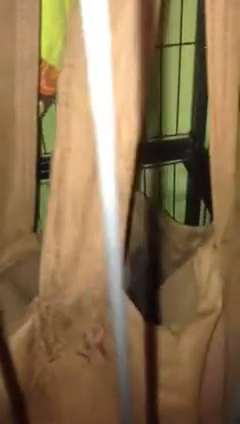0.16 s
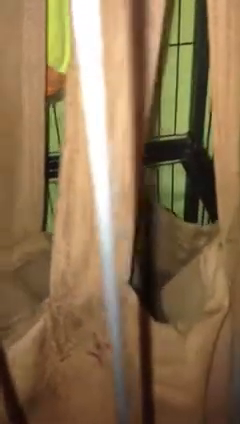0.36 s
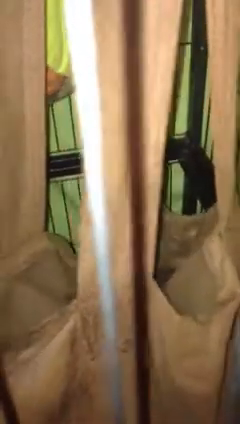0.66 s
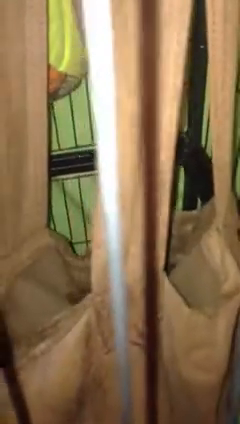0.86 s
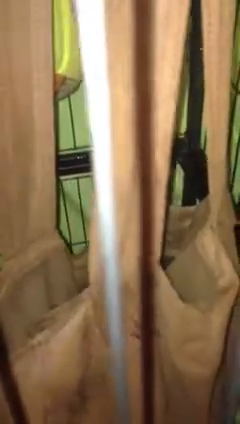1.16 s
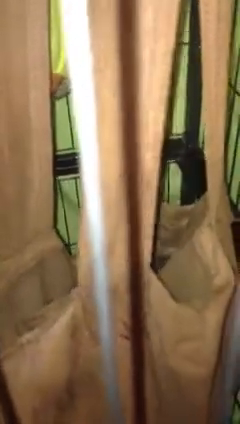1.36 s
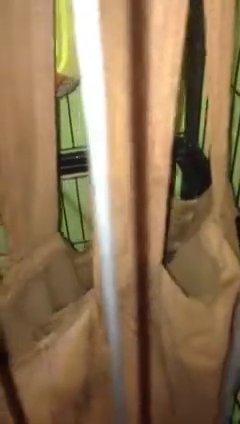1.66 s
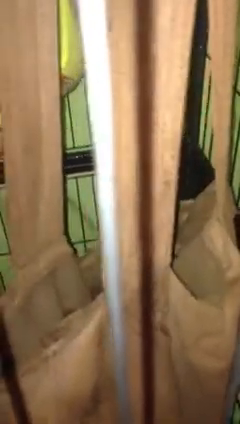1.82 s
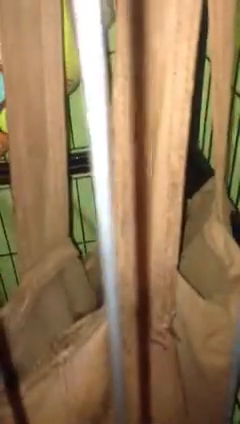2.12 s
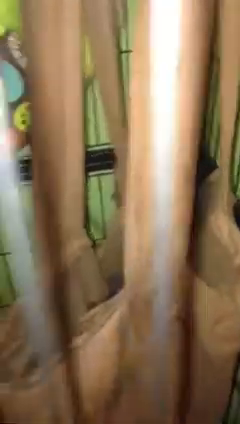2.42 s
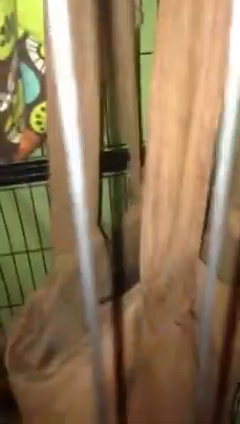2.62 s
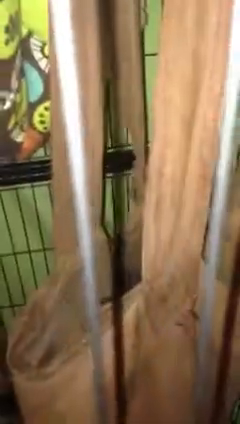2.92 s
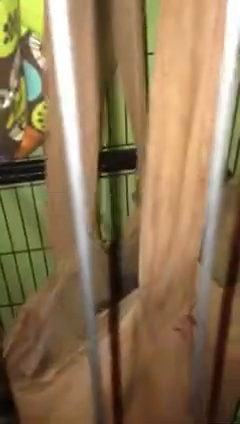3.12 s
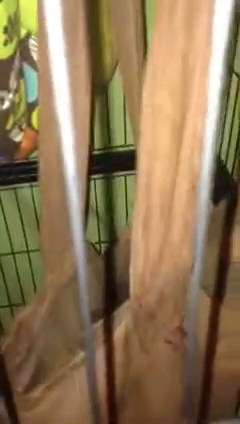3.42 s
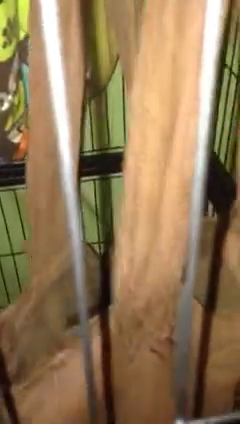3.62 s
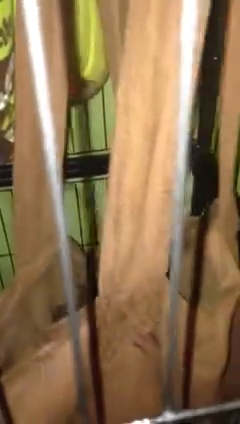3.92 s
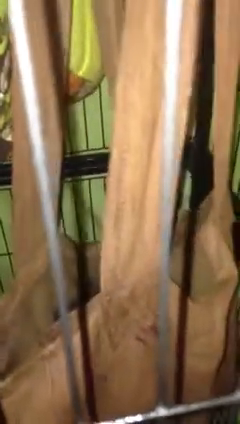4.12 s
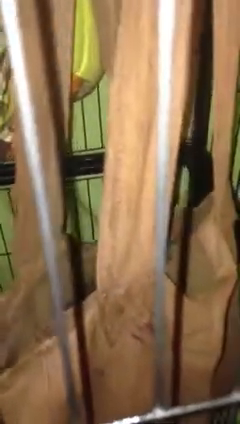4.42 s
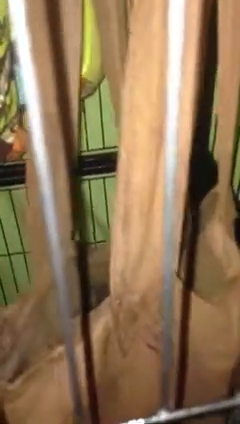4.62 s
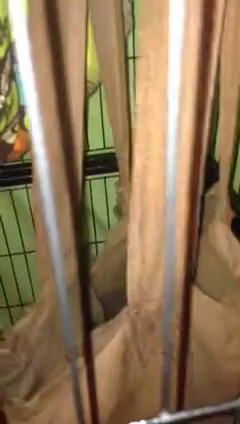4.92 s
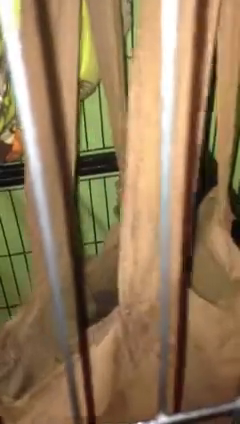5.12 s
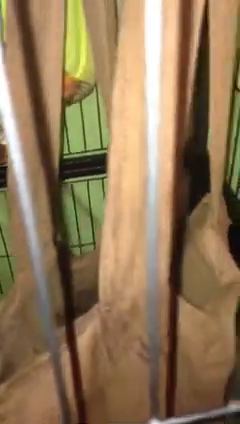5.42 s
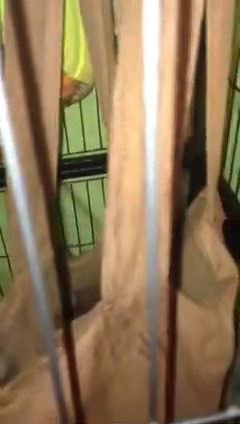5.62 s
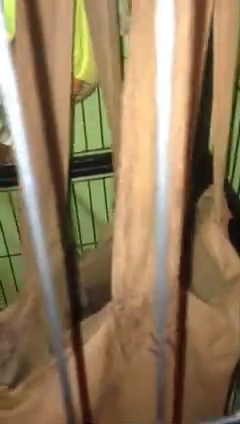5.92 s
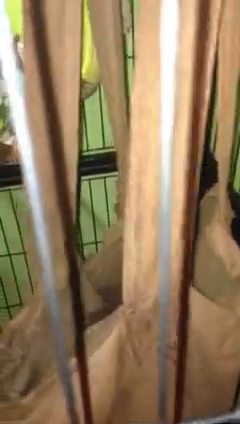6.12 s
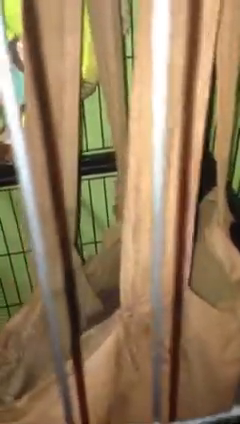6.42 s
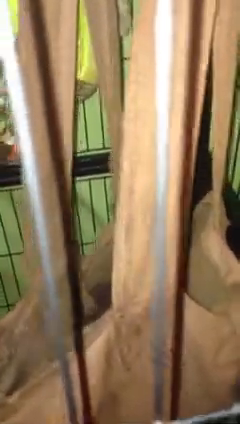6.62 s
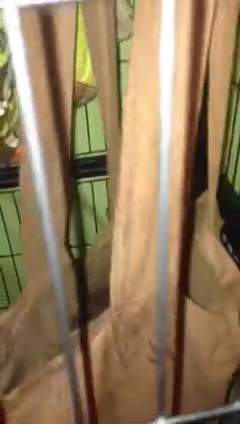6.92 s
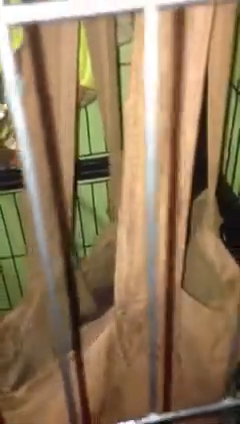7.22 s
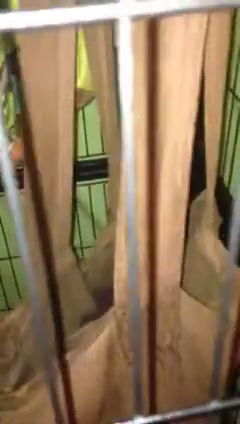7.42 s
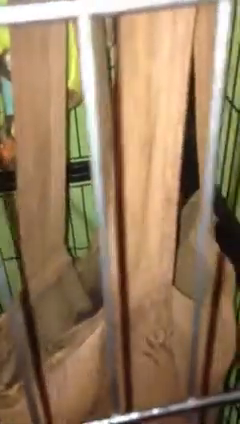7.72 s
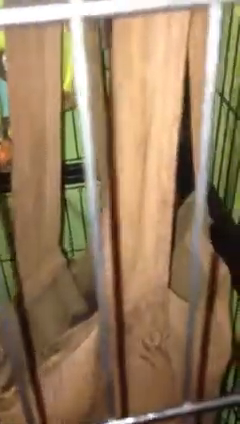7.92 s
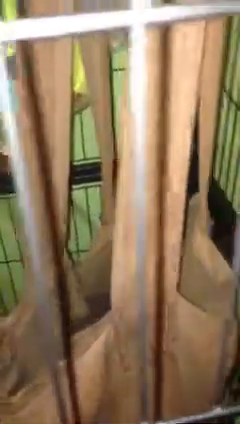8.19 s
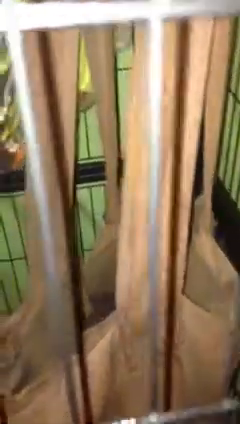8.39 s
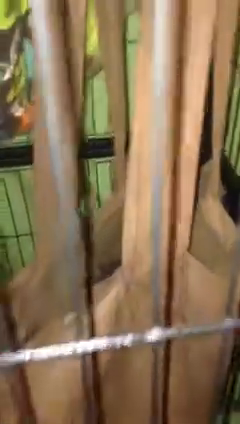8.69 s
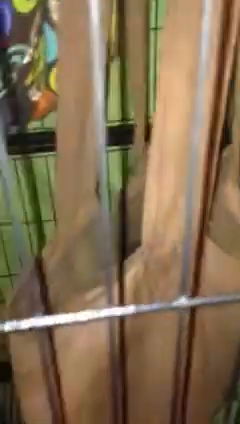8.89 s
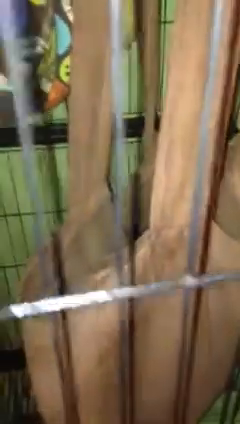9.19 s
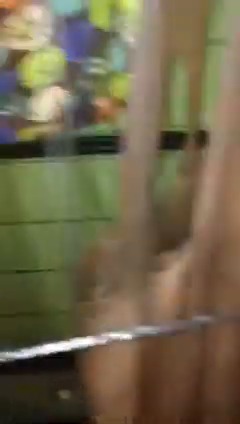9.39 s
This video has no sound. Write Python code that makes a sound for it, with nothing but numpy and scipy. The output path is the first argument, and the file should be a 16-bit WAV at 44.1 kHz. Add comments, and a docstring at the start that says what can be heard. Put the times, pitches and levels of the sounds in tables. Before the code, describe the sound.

In a small, slightly echoing room, a little animal close by gives a steady run of short, rising, raspy squeaks. Its cloth sling rustles faintly and the wire cage clinks now and then. Past the middle, the metal rattles harder, with a few dull knocks. Near the end the calls cease, and the loudest burst of clattering bars and swishing fabric is followed by a few last clinks and a knock.

```python
"""Squeaks, about three a second: a kinkajou's low whimper sweeps hoarsely up into a thin whistle.
It stirs in a cloth hammock inside a wire cage, in a small, live room. The fibres catch and slip in a
rustle, and the sling bumps under its weight. Wire strikes wire in clinks and rattles that set the bars
ringing, harder towards the end, with a few dull knocks on the frame. Faint room air lies underneath."""
import sys
import numpy as np
from scipy import signal
from scipy.fft import rfft, irfft
from scipy.io import wavfile

SR = 44100
rng = np.random.default_rng(int(sys.argv[2]) if len(sys.argv) > 2 else 0)


def master_out(mix):
    """Clip the mix to full scale and print it as 16-bit PCM to the path in sys.argv[1]."""
    frames = np.transpose(np.atleast_2d(mix))
    ceiling = np.clip(frames, -1, 1)
    pcm = np.round(ceiling * 32767).astype(np.int16)
    wavfile.write(sys.argv[1], SR, pcm)


N = 421155
TIME = np.arange(N) / SR

# The whimper's pitch dip: share_of_whimper, pitch_ratio
WHIMPER_DIP = [(0, 1.07), (.2, 1.01), (0.421, 1.0), (0.652, 1.09), (0.852, 1.22)]
def squeak_pitch(t, whimper_s, sweep_s, whimper_hz, ceiling_hz, sweep_from_hz=999, break_hz=2397):
    """The pitch dips, climbs ever faster, flips up into the whistle and flattens under its ceiling."""
    overshoot, bend, flip_ratio, knee = 1.3, 1.15, 1.1, 5.5
    share, ratio = np.transpose(WHIMPER_DIP)
    whimper = np.interp(t / whimper_s, np.append(share, 1), np.append(whimper_hz * ratio, sweep_from_hz))
    octaves = overshoot * np.log2(ceiling_hz / sweep_from_hz)
    aim_hz = whimper * 2 ** (octaves * np.clip((t - whimper_s) / sweep_s, 0, 2) ** bend)
    aim_hz *= np.where(aim_hz > break_hz, flip_ratio, 1)
    return aim_hz / (1 + (aim_hz / ceiling_hz) ** knee) ** (1 / knee)


# The voice's two timbres: harmonic_number, whimper_db, whistle_db
HARMONICS = [(1, -1, -0.5), (2, -5.5, -20.5), (3, -20, -21), (4, -23, -30), (5, -27, -27), (6, -54, -24),
             (7, -31, -54)]
def throat_tone(hz, phase, nasal_hz=3180, nasal_width_hz=550, nasal_db=8):
    """The tone thins to a nearly pure whistle as it rises; a nasal resonance lifts the overtones."""
    thinness = np.interp(hz, [740, 1100, 2800], [0, .65, 1])
    tone = 0
    for k, whimper_db, whistle_db in HARMONICS:
        lift_db = (k > 1) * nasal_db * np.exp(-((k * hz - nasal_hz) / nasal_width_hz) ** 2)
        gain = from_db(whimper_db + thinness * (whistle_db - whimper_db) + lift_db)
        tone += np.sin(k * phase) * gain * (k * hz < SR / 2)
    return np.sqrt(2) * tone


# Mouth resonances that swell the voice as it passes: pitch_hz, gain_db
MOUTH_GAIN = [(680, -0.5), (850, -2.5), (1050, 2), (1350, 1), (2000, -3.5), (2900, 0.5)]
# Throat colour of the rasp: frequency_hz, gain_db
RASP_EQ = [(500, 0), (900, -7), (1500, -29), (2100, 14), (3100, 18), (4000, -12), (6500, -28), (10000, -16)]
# Squeak cues: start_s, whimper_s, sweep_s, whimper_hz, ceiling_hz, level_db, tip_gain_db
SQUEAK_CUES = [ (0.000, 0.068, 0.07, 663, 1900, -56.5, -3.5), (0.278, 0.072, .18, 640, 2830, -56, -1),
               (0.649, 0.11, 0.082, 658, 1913, -55.5, -15), (1.082, 0.089, .027, 625, 1400, -58.5, -14),
               (1.44, 0.097, 0.068, 637, 2066, -57.5, 3), (2.056, 0.099, 0.088, 676, 2050, -58, -6),
               (2.316, 0.1, 0.15, 713, 3647, -55, 5.5), (2.694, 0.094, 0.18, 714, 3480, -49, 8),
               (3.109, 0.085, 0.1, 654, 2198, -51.5, -3), (3.432, 0.086, .15, 699, 2725, -54.5, -1.5),
               (3.766, 0.089, 0.074, 670, 2096, -52.5, 2.5), (4.105, .1, 0.063, 670, 2190, -53.5, 2),
               (4.398, .13, 0.12, 666, 2505, -50, -8), (4.716, .11, .12, 678, 3230, -46.5, 0),
               (5.037, .11, 0.16, 735, 3180, -47, -0.5), (5.387, 0.096, 0.14, 721, 2995, -48, -2),
               (5.701, .115, 0.099, 709, 2208, -48.5, 6), (6.028, 0.099, 0.11, 694.5, 2320, -53.5, 2),
               (6.346, .072, .135, 697, 3400, -50.5, 5.5), (6.671, 0.095, 0.15, 700, 2970, -53.5, -11),
               (6.974, 0.11, .08, 691, 1950, -48.5, -4), (7.293, .11, .065, 697, 1835, -51, -2),
               (7.564, .11, 0.055, 664.5, 1560, -49, -4), (7.833, 0.09, 0.034, 678, 1650, -48.5, -7)]
def squeaks(attack_s=0.01, release_s=0.0095, shimmer_db=4.0, rasp_db=-13.0):
    """The voice sweeps from whimper to whistle, unsteady and hoarse between the two registers."""
    tone, turbulence, t = np.zeros(N), np.zeros(N), TIME[:SR // 2]
    for start_s, whimper_s, sweep_s, whimper_hz, ceiling_hz, level_db, tip_gain_db in SQUEAK_CUES:
        hz = squeak_pitch(t, whimper_s, sweep_s, whimper_hz, ceiling_hz)
        hoarseness = np.interp(hz, [993, 1450, 2060, 2940], [0.036, 0.68, 0.68, 0.033])
        jitter = (0.013 + 0.0524 * hoarseness) * (drift(1100, len(t)) + 0.562 * drift(60, len(t)))
        phase = 2 * np.pi * np.cumsum(hz * (1 + jitter)) / SR
        # the level swells into the sweep, sags, then steps to the tip's gain
        tip_s = whimper_s + 0.69 * sweep_s
        shape_db = np.interp(t, [whimper_s / 2, whimper_s, tip_s], [-2, 0, -2.13], right=tip_gain_db)
        unsteadiness = np.interp(hz, [700, 1400, 2200, 2900], [0.8, 1.0, 0.89, 0.4])
        flicker_db = shimmer_db * unsteadiness * drift(129.4, len(t))
        gate = np.clip(t / attack_s, 0, 1) * np.clip((whimper_s + sweep_s - t) / release_s + .5, 0, 1)
        effort = gate * from_db(level_db + shape_db + at_hz(MOUTH_GAIN, hz) + flicker_db)
        add(tone, start_s, effort * throat_tone(hz, phase))
        # the rasp is pulsed by each cycle and fades out in the whistle
        rasp = np.interp(hz, [700, 1150, 1970, 2870], [0.54, 0.14, 0.64, 0.034]) * (1 + np.sin(phase))
        add(turbulence, start_s, effort * rasp * rng.standard_normal(len(t)))
    return tone + from_db(rasp_db) * colour(turbulence, RASP_EQ)


# Brief high tones in the squeaks: start_s, length_s, pitch_hz, level_db
FLARE_CUES = [(2.57, 0.021, 4060, -49), (4.843, 0.051, 3190, -50.5), (5.522, 0.033, 2810, -57)]
def high_flares():
    """A brief, pure high tone rings out in a squeak, like an overtone flaring or the pitch flipping up."""
    out = np.zeros(N)
    for start_s, length_s, pitch_hz, level_db in FLARE_CUES:
        swell = np.interp((TIME - start_s) / length_s, [0, .5, 1], [0, 1, 0])
        out += np.sqrt(2) * from_db(level_db) * swell * np.sin(2 * np.pi * pitch_hz * TIME)
    return out


def wire_contact(force_db, chatter_s, body_db, touches_per_s=7000, snap_fade_s=0.06):
    """Wire meets wire: a short contact snaps, a long one builds into a dying chatter."""
    t = TIME[:SR // 6]
    touches = rng.standard_normal(len(t)) * (rng.random(len(t)) < touches_per_s / SR)
    build = 1 - np.exp(-t / (0.089 * chatter_s))
    force = unit_energy(touches * build * np.exp(-t / chatter_s))
    force[0] += 0.24 * np.exp(-chatter_s / snap_fade_s)
    body = from_db(body_db) * band(force, 2080, "low")
    middle = band(force, [3000, 8000], "band")
    sparkle = from_db(2 + 0.18 * (force_db + 19)) * band(force, 4660, "high")   # harder is brighter
    return from_db(force_db) * unit_energy(middle - body - sparkle)


# Ringing modes of the bars: pitch_hz, level_db, t60_s
BAR_MODES = [(1790, -12, .5), (3030, -15, .4), (4458, -7, .25), (4528, -7, .25), (4606, -4, .3),
             (4644, -4, .3), (4942, -3, .2), (5072, -6, .2), (5263, -6, .2), (6885, -5, .15),
             (6966, -5, .15), (8504, -1, .15), (8835, -3, .15), (11274, -3, .12)]
def bar_ring(spread_db=1.5, detune=0.0019):
    """The point of contact decides how strongly each mode rings; pressed bars ring a touch off pitch."""
    t = TIME[:SR // 2]
    pitch_hz, level_db, t60_s = np.transpose(BAR_MODES)[:, :, None]
    modes = np.sin(2 * np.pi * pitch_hz * t) * from_db(level_db - 60 * t / t60_s)
    weights = from_db(spread_db * rng.standard_normal(len(modes))) * rng.choice([-1, 1], len(modes))
    pitch_ratio = 1 + detune * rng.uniform(-1.24, 1)
    return unit_energy(np.interp(t * pitch_ratio, t, weights @ modes))


# Colour of the mesh clatter: frequency_hz, gain_db
MESH_EQ = [(150, -78), (275, -13), (372, -26.5), (681, -20), (852, -20), (1760, -13), (2280, -11.5),
           (4240, -6), (4790, 0), (5790, -4.5), (12400, -8.5), (15500, -14)]
# Clink and rattle cues: start_s, force_db, chatter_s, body_db
CLINK_CUES = [(0.3035, -48, 0.0029, -9), (0.5964, -43, 0.019, 4), (0.813, -40, 0.012, -3),
              (1.242, -41.5, 0.0051, 9.5), (1.5177, -35, 0.0022, -8), (1.856, -46.5, 0.0061, -8),
              (1.918, -45, 0.006, 5), (2.043, -20, 0.0036, -4), (2.0517, -29, 0.0059, 5.5),
              (4.1062, -45, 0.0058, -1), (5.1722, -36.5, 0.0044, 4), (5.2969, -34, .006, 7),
              (5.3676, -34, 0.0032, 9), (5.626, -38.5, 0.0027, 0), (5.7483, -17, 0.0089, 7.5),
              (6.0476, -33, 0.0095, 3.5), (6.0873, -22, 0.0017, 2.5), (6.156, -33.5, 0.0088, 6),
              (6.2396, -26.5, 0.013, 4), (6.273, -16.5, 0.013, 4), (6.3935, -32.5, 0.0027, 6),
              (6.506, -27, 0.019, 10), (6.7255, -27.5, .003, 2), (6.789, -26.5, 0.0094, 6),
              (6.8394, -30, 0.0073, 6.5), (6.8807, -21, 0.0014, 0), (7.0943, -30, 0.014, -3),
              (7.155, -31, 0.015, 3), (7.175, -21, .012, 6.5), (7.34, -36.5, 0.012, 6),
              (7.972, -9, 0.021, 5.5), (8.0746, -11, 0.022, 7), (8.249, -13, 0.0034, -5),
              (8.2585, -10.5, 0.012, 4), (8.3014, -11.5, 0.028, 1), (8.3655, -9.5, 0.021, -3),
              (8.4577, -16.5, 0.024, 3), (8.5221, -17, 0.024, 5), (8.6427, -26, 0.013, 0.5),
              (8.7647, -29, 0.0081, 3), (8.7863, -9.5, 0.0031, 6), (8.952, -16.5, 0.002, -0.5),
              (9.2964, -25.5, 0.002, 2.5), (9.3345, -23, 0.015, 14), (9.5109, -29.5, .012, 9.5)]
def cage_clinks(gain_db=19.5, ring_db=-9.0, mesh_db=-1.5, mesh_t60_s=0.022):
    """Each contact sets its own mix of bars ringing, over the brief dense clatter of the welded mesh."""
    clatter, ringing = np.zeros(N), np.zeros(N)
    mesh_decay = from_db(-60 * TIME[:SR // 8] / mesh_t60_s)
    for start_s, force_db, chatter_s, body_db in CLINK_CUES:
        force = from_db(gain_db) * wire_contact(force_db, chatter_s, body_db)
        mesh = from_db(mesh_db) * unit_energy(rng.standard_normal(len(mesh_decay)) * mesh_decay)
        mesh[0] += 1   # the direct click
        add(clatter, start_s, convolve(force, unit_energy(mesh)))
        add(ringing, start_s, convolve(force, from_db(ring_db) * bar_ring()))
    # thin wire radiates no bass
    return band(colour(clatter, MESH_EQ), 110, "high") + band(ringing, 1340, "high")


# Knock cues: start_s, force_db, tone_hz, t60_s
KNOCK_CUES = [(0.243, -42.5, 1100, 0.023), (1.049, -39.5, 1620, 0.0075), (4.675, -36.5, 1240, .07),
              (5.3, -31, 950, 0.045), (6.275, -36, 2470, 0.072), (6.505, -26.5, 1690, .07),
              (6.539, -34.5, 740, 0.037), (7.172, -38, 1360, .07), (9.336, -24.5, 1110, 0.55)]
def frame_knocks(gain_db=14.5):
    """Padded blows on the cage frame give a short, dull tock."""
    out, t = np.zeros(N), TIME[:SR // 5]
    for start_s, force_db, tone_hz, t60_s in KNOCK_CUES:
        burst = rng.standard_normal(len(t)) * from_db(-60 * t / t60_s)
        tock = band(burst, [tone_hz / 1.84, tone_hz * 1.39], "band")
        add(out, start_s, from_db(force_db + gain_db) * unit_energy(tock))
    return out


def cloth_friction(eq, grains_per_s=900, grain_spread_db=0.5, flutter_db=4.0):
    """Fibres catch and slip in small grains over a soft hiss."""
    sizes = from_db(grain_spread_db * np.minimum(rng.exponential(1, N), 4)) * rng.choice([-1, 1], N)
    grains = unit_rms(sizes * (rng.random(N) < grains_per_s / SR))
    hiss = rng.standard_normal(N)
    flutter = from_db(flutter_db * drift(50))
    return unit_rms(colour((grains + hiss) * flutter, eq))


# Colours of the cloth's rustle, its swish and the sling's bump: frequency_hz, gain_db
RUSTLE_EQ = [(470, -30.5), (800, 2), (1840, 4.5), (2080, -5.5), (3860, 0.5), (4770, 0), (6670, -2.5),
             (8550, 1), (11500, -18), (15500, -15)]
SWISH_EQ = [(880, -21.5), (1500, -3), (2860, -2), (3650, -4.5), (6130, 0), (7670, -1), (11600, -7.5),
            (15500, -12.5)]
BUMP_EQ = [(26, -36), (45, -52), (112, -1.5), (150, 4), (525, 1.5), (660, 2), (727, -8), (829, -1.5),
           (1290, -2), (1420, -15), (1750, -1), (2200, -36), (2860, -28), (4840, -120)]
# Fader curves for the constant stirring: time_s, rustle_db, bump_db
STIR_LEVELS = [(0.0, -67.5, -74), (2.71, -61, -71), (4.489, -69.5, -80.5), (4.73, -61.5, -64),
               (6.09, -48.5, -72.5), (6.22, -43.5, -70), (7.15, -52.5, -68.5), (7.5, -55, -64),
               (8.38, -36, -60), (9.2, -44.5, -59.5), (9.55, -48, -61)]
# The animal shifts its weight: start_s, length_s, swish_db, bump_db
SHIFT_CUES = [(0.697, 0.43, -74, -63), (0.8, 0.39, -55, -68), (2.108, 0.24, -54, -56),
              (2.78, 0.23, -65, -61), (3.979, 0.15, -54, -65), (4.617, 0.27, -46.5, -55),
              (5.156, 0.28, -49.5, -63), (6.257, 0.23, -54, -61), (6.494, 0.061, -64, -50.5),
              (7.138, 0.18, -42, -52.5), (7.647, 0.19, -41, -55), (7.835, 0.51, -39.5, -74),
              (8.276, 0.25, -32, -53)]
def hammock(rustle_trim_db=-8.0):
    """The cloth rustles and swishes while the sling bumps softly under the animal's weight."""
    time_s, rustle_db, stir_bump_db = np.transpose(STIR_LEVELS)
    sliding, weight = np.zeros(N), from_db(np.interp(TIME, time_s, stir_bump_db))
    for start_s, length_s, swish_db, bump_db in SHIFT_CUES:
        move = np.interp((TIME - start_s) / length_s, [0, .08, .35, 1], [0, 0.76, 0.72, 0])
        sliding += from_db(swish_db) * move
        weight += from_db(bump_db) * move
    rustle = cloth_friction(RUSTLE_EQ) * from_db(np.interp(TIME, time_s, rustle_db) + rustle_trim_db)
    bumps = weight * unit_rms(colour(rng.standard_normal(N), BUMP_EQ))
    swish = sliding * cloth_friction(SWISH_EQ)
    return band(rustle + bumps + swish, 82, "high")


# Reverb decay by band: frequency_hz, t60_s
ROOM_DECAY = [(150, 0.98), (1000, 0.29), (3300, 0.38), (8000, 0.26), (15000, 0.17)]
def room(x, wet_db):
    """Direct sound plus a diffuse tail whose treble dies first; power is kept."""
    t = TIME[:SR // 2]
    noise, hz = rfft(rng.standard_normal(len(t))), np.linspace(0, SR / 2, len(t) // 2 + 1)
    bands_hz, decays_s = np.transpose(ROOM_DECAY)
    tail = 0
    for solo, t60_s in zip(np.eye(len(bands_hz)), decays_s):
        crossfade = at_hz(np.column_stack([bands_hz, solo]), hz)
        tail += irfft(noise * crossfade, len(t)) * from_db(-60 * t / t60_s)
    response = from_db(wet_db) * unit_energy(tail * (t > .002))   # 2 ms pre-delay
    response[0] += 1
    return convolve(x, unit_energy(response))


# Colour of the room tone: frequency_hz, gain_db
AIR_EQ = [(15, -46), (25, 5), (69, -16.5), (156, 10.5), (389, 5.5), (703, 1.5), (1020, -16), (1340, -3),
          (3090, -8.5), (7700, -7), (10100, -14), (14300, -6.5), (15500, -14.5)]
def room_air(level_db=-68):
    """Still air: a faint, steady bed of dark noise."""
    return from_db(level_db) * unit_rms(colour(rng.standard_normal(N), AIR_EQ))


def from_db(db):
    """Decibels to gain."""
    return 10 ** (np.asarray(db) / 20)


def unit_rms(x):
    """Scale to unit rms."""
    return x / np.sqrt(np.mean(x ** 2) + 1e-20)


def unit_energy(x):
    """Scale to unit energy."""
    return x / np.sqrt(np.sum(x ** 2) + 1e-20)


def at_hz(points, hz):
    """Read a table on a log-frequency axis."""
    known_hz, values = np.transpose(points)
    return np.interp(np.log(np.maximum(hz, 1)), np.log(known_hz), values)


def convolve(x, response):
    """Play a sound through an impulse response."""
    return signal.fftconvolve(x, response)[:N]


def band(x, edges_hz, kind):
    """Second-order Butterworth filter."""
    return signal.sosfilt(signal.butter(2, edges_hz, kind, fs=SR, output="sos"), x + 1e-18)


def colour(x, eq, size=4096):
    """Apply an EQ curve as a minimum-phase filter of unit energy."""
    gain = from_db(at_hz(eq, np.linspace(0, SR / 2, size // 2 + 1)))
    cepstrum = irfft(np.log(gain))
    cepstrum[1:size // 2] *= 2
    cepstrum[size // 2 + 1:] = 0
    return convolve(x, unit_energy(irfft(np.exp(rfft(cepstrum)))))


def drift(turns_per_s, size=N):
    """Random wander."""
    steps = np.arange(size) * turns_per_s / SR
    return np.interp(steps, np.arange(size), rng.standard_normal(size))


def add(track, start_s, sound):
    """Mix a sound in at a given time."""
    at = int(start_s * SR)
    track[at:at + len(sound)] += sound[:N - at]


def scene():
    """Voice and cage with room reverb, over dry cloth and still air, in mono."""
    voice = room(squeaks() + high_flares(), wet_db=1.0)
    metal = room(cage_clinks() + frame_knocks(), wet_db=-1.5)
    return (voice + metal + hammock() + room_air())[None]


def record(dry):
    """A steep high cut at 15.5 kHz."""
    return signal.sosfilt(signal.ellip(10, .2, 70, 15500, fs=SR, output="sos"), dry)


dry = scene()
out = record(dry)
master_out(out)
```